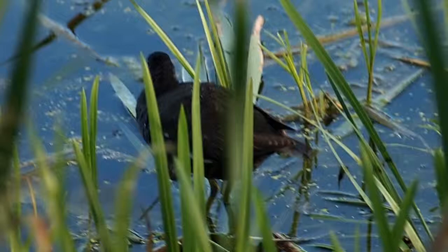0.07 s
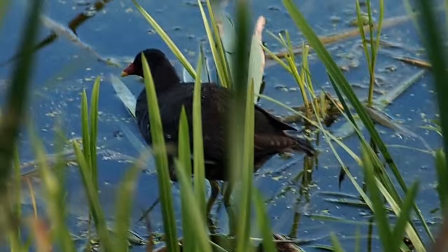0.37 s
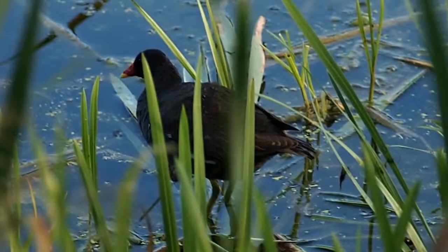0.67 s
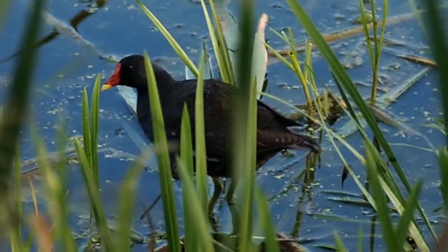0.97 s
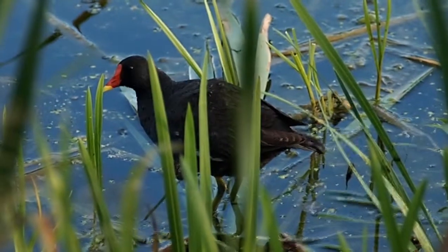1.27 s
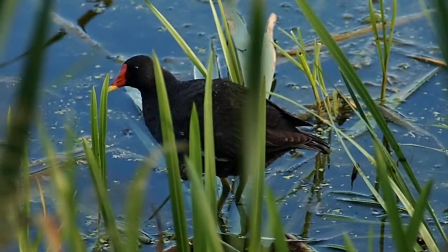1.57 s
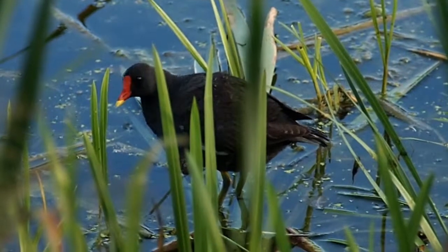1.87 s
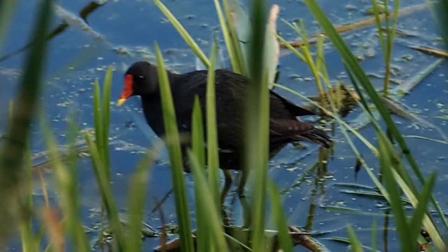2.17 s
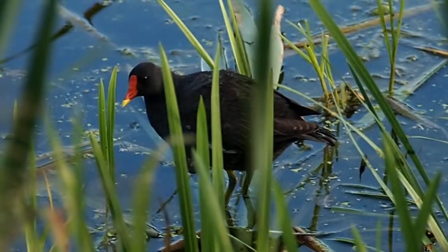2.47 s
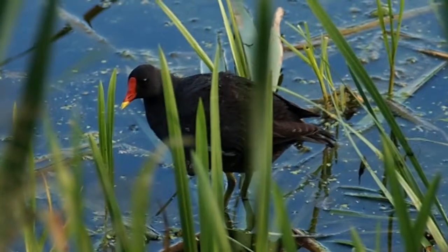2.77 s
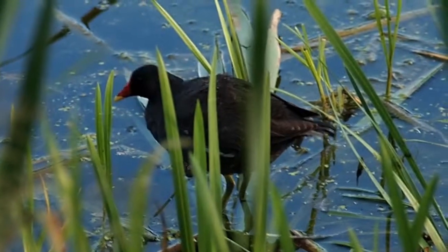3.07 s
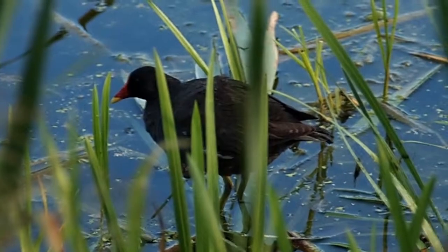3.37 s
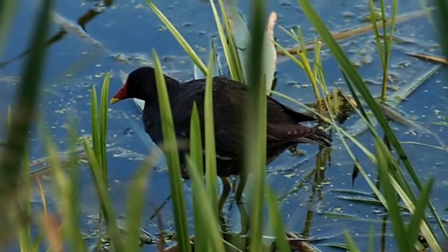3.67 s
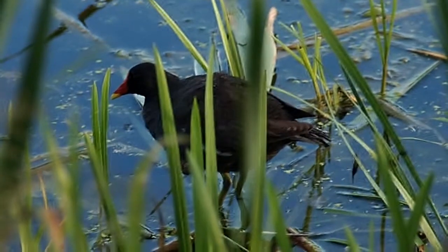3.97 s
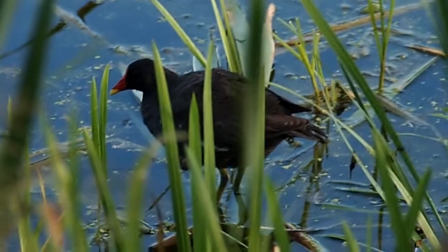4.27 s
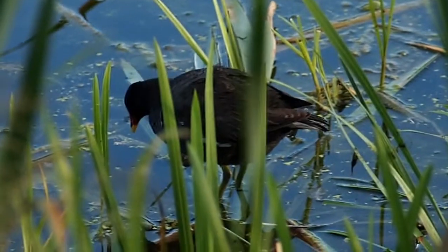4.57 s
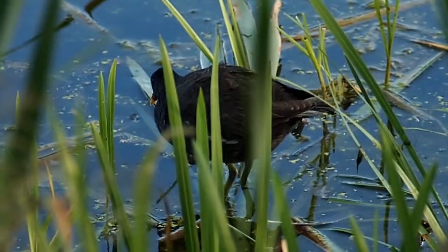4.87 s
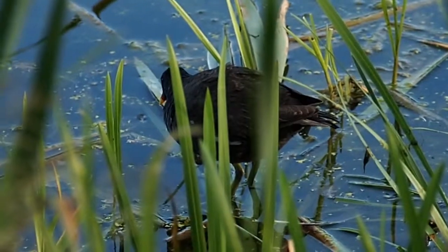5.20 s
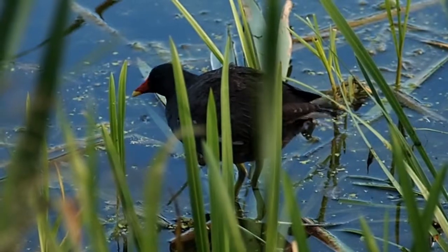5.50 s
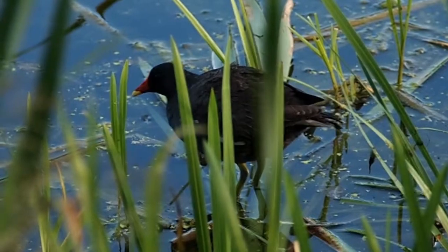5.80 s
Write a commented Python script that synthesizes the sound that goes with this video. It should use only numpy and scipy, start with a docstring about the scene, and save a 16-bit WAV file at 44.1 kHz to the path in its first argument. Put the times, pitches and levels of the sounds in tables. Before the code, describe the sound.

One brief, rasping moorhen call sounds close to the microphone early on, standing out against the continuous low rumble of a faraway road. The waterside is otherwise quiet: reeds rub softly now and then, small birds chip very faintly in the distance, and a light hiss lies over everything. Toward the end, a faint, high, fluttering whine rises and fades three times.

```python
"""Distant traffic rumbles from first to last, with a low engine drone and a thin microphone hiss.
Small birds chip far away and reeds brush softly by friction. About a second in, a moorhen gives one
short, harsh call: pulses from its syrinx ring the resonances of its throat, and the bank of the pond
reflects a faint echo. Near the end a thin, far-off whine swells three times."""
import sys
import numpy as np
from scipy import signal
from scipy.fft import rfft, irfft
from scipy.io import wavfile

SR = 44100
rng = np.random.default_rng(int(sys.argv[2]) if len(sys.argv) > 2 else 0)


def store_wav(level_fs):
    """Save 16-bit WAV to argv[1]."""
    pcm = np.round(np.clip(np.atleast_2d(level_fs), -1, 1) * 32767)
    wavfile.write(sys.argv[1], SR, pcm.T.astype(np.int16))


N = 261954
TIME = np.arange(N) / SR


def amp(db):
    """Decibels as an amplitude ratio."""
    return 10 ** (np.asarray(db) / 20)


def unit(x):
    """Normalisation to rms 1."""
    return x / np.sqrt(np.mean(x ** 2) + 1e-20)


def curve(points, t):
    """Linear interpolation of (time_s, value) points at the times t."""
    return np.interp(t, *np.transpose(points))


def spectrum(points, hz):
    """Gain interpolated from (frequency_hz, level_db) points on a log-frequency axis."""
    f, db = np.transpose(points)
    return amp(np.interp(np.log(hz + 1), np.log(f + 1), db))


def noise(shape):
    """Spectral shaping: white noise weighted by shape(hz), at rms 1."""
    return unit(irfft(rfft(rng.standard_normal(N)) * shape(np.fft.rfftfreq(N, 1 / SR)), N))


def drift(rate_hz):
    """Random modulation: low-pass noise that rolls off around rate_hz."""
    return noise(lambda hz: np.exp(-(hz / rate_hz) ** 2))


def swell(centre_s, length_s):
    """A Gaussian envelope of height 1."""
    return np.exp(-(2 * (TIME - centre_s) / length_s) ** 2)


def colour(x, points, size=2048):
    """Minimum-phase filtering: each pulse rings only after it arrives."""
    log_gain = np.log(spectrum(points, abs(np.fft.fftfreq(size, 1 / SR))))
    ring = np.fft.ifft(np.exp(np.conj(signal.hilbert(log_gain)))).real
    return signal.fftconvolve(x, ring)[:len(x)]


def resonate(x, hz, width_hz):
    """A damped resonator of gain 1 whose centre follows the curve hz."""
    phasor = np.exp(2j * np.pi * np.cumsum(hz) / SR)
    decay = np.exp(-np.pi * width_hz / SR)
    return 2 * (phasor * signal.lfilter([1 - decay], [1, -decay], x / phasor)).real


def far_tone(hz, wander, flutter_db, flutter_hz):
    """Scintillation: moving air modulates the pitch and level of a distant tone."""
    cycles = np.cumsum(hz * (1 + wander * drift(21.6))) / SR
    return unit(amp(flutter_db * drift(flutter_hz)) * np.sin(2 * np.pi * cycles))


# Spectral density of far traffic: frequency_hz, relative_db
TRAFFIC_SPECTRUM = [(12, -26), (30, -9), (56, 0), (120, -3), (165, -7), (240, -10), (390, -11),
                    (480, -17.5), (950, -16.5), (1500, -24), (2000, -31), (3000, -40), (4200, -44),
                    (6500, -62)]
# Envelope of the engine rumble: time_s, level_db
RUMBLE_ENVELOPE = [(.6, -36.5), (1.1, -37.5), (1.45, -41.5), (1.57, -34.5), (2.5, -37), (3.65, -37.5),
                   (4.02, -35.3), (4.85, -37), (5.94, -38)]

def traffic(split_hz=200, roar_db=-39.5, lumps_db=.8, waver_db=.42):
    """Amplitude-modulated noise in two bands: lumpy engine rumble under a smoother roar of tyres."""
    low_share = lambda hz: 1 / (1 + (hz / split_hz) ** 8)
    rumble = noise(lambda hz: spectrum(TRAFFIC_SPECTRUM, hz) * np.sqrt(low_share(hz)))
    roar = noise(lambda hz: spectrum(TRAFFIC_SPECTRUM, hz) * np.sqrt(1 - low_share(hz)))
    rumble *= amp(curve(RUMBLE_ENVELOPE, TIME) + lumps_db * drift(3.6))
    roar *= amp(roar_db + waver_db * drift(16))
    return rumble + roar


def engine_drone(pitch_hz=93.8, steady_db=-47.5, passing_db=-41.5):
    """Periodic vibration: one engine holds a low tone, loudest as it passes."""
    envelope = amp(steady_db) + amp(passing_db) * swell(centre_s=.96, length_s=.56)
    return far_tone(pitch_hz, wander=.031, flutter_db=-.7, flutter_hz=17) * envelope


# Spectral density of the hiss: frequency_hz, relative_db
HISS_SPECTRUM = [(2500, -24), (5200, -10.5), (6500, -7.5), (8500, -4), (10000, -1.8), (13000, -1),
                 (15500, -0.5)]

def microphone_hiss(level_db=-54.5):
    """Self-noise: a stationary hiss, strongest in the high treble."""
    return amp(level_db) * noise(lambda hz: spectrum(HISS_SPECTRUM, hz))


# Chips of far birds: centre_s, level_db, length_s, pitch_hz
BIRD_CHIPS = [(.398, -61.5, .018, 5750), (.41, -57, .02, 2300), (.419, -67, .014, 5850),
              (.853, -61, .045, 4200), (4.885, -56, .035, 2100)]

def small_birds(blur=.035, count=16, twitter_db=-73):
    """Frequency modulation blurs tiny, distant notes; fainter ones twitter at random."""
    warped_s = np.cumsum(1 + blur * drift(160)) / SR
    twitter = [(when * N / SR, twitter_db + 4 * size, .025, 4500 + 2700 * height)
               for when, size, height in rng.random((count, 3))]
    return sum(amp(db) * swell(centre, length) * np.sin(2 * np.pi * hz * warped_s)
               for centre, db, length, hz in BIRD_CHIPS + twitter)


# Strokes of leaf on leaf: centre_s, level_db, length_s
REED_STROKES = [(.41, -58, .035), (.85, -64, .07), (1.77, -63, .04), (2.54, -59, .04), (2.785, -58, .06),
                (2.815, -48, .038), (4.885, -54, .05)]
# Spectral density of the rubbing: frequency_hz, relative_db
REED_SPECTRUM = [(900, -14), (1600, -2), (2400, 1), (3300, -12), (4600, -15), (6200, -31), (10000, -42)]

def reeds(grain_db=1.2):
    """Stick-slip friction: leaves slide briefly over each other in grainy bursts of noise."""
    strokes = sum(amp(db) * swell(centre, length) for centre, db, length in REED_STROKES)
    friction = noise(lambda hz: spectrum(REED_SPECTRUM, hz))
    return friction * strokes * unit(amp(grain_db * drift(200)))


# Main resonance of the throat, bill nearly shut and open: frequency_hz, shut_db, open_db
THROAT_RESPONSE = [(400, -49, -21), (1050, -21, -27), (1310, -16, -17), (1670, -5.5, -13), (2130, -8, 0.5),
                   (2210, -4, -1), (2700, -20, -20), (3000, -32, -30.5), (3600, -42, -43), (5000, -58, -58)]
# Bright upper resonances: centre_hz, width_hz, relative_db
UPPER_FORMANTS = [(4550, 350, -5.5), (5520, 470, -9), (5940, 610, 0), (7240, 900, -10)]
# Their waver before they settle: time_s, frequency_ratio
FORMANT_WAVER = [(1.116, 1.12), (1.123, .88), (1.138, .88), (1.144, 1.16), (1.150, 1.16), (1.158, 1)]

def moorhen(start_s=1.11, push_s=.08, release_s=.016, attack_s=.008, jitter_cycles=.08, shimmer=.07):
    """Source and filter: syrinx pulses ring a throat whose resonance narrows as the bill opens."""
    t = np.arange(0, push_s + release_s, 1 / SR)
    # The bird pushes harder and harder, then lets go; the bill opens partway through.
    push = np.minimum(t / push_s, 1)
    released_s = np.maximum(t - push_s, 0)
    opening = 1 / (1 + np.exp((.03 - t) / .005))
    # The pitch climbs, levels off and flicks up on release.
    start_hz, top_hz, glide_s, flick_hz_per_s = 264, 341.5, .0265, 1400
    pitch_hz = top_hz + (start_hz - top_hz) * np.exp(-t / glide_s) + flick_hz_per_s * released_s
    # Source: roughness makes the pulses uneven and adds a puff of air to each.
    rough = np.clip(.14 * (1 - opening) + .065 * opening + 11 * released_s, 0, 1)
    cycles = np.cumsum(pitch_hz) / SR + .5 + jitter_cycles * rough * drift(290)[:len(t)]
    pulses = unit(np.cos(2 * np.pi * np.outer(cycles, np.arange(1, 28))).sum(1))
    pulses *= 1 + shimmer * drift(200)[:len(t)]
    puffs = unit(np.exp(-(cycles % 1) / .23) * rng.standard_normal(len(t)))
    drive = (1 - rough) * pulses + rough * puffs
    # Filter: the throat crossfades from its shut response to its open one.
    throat = np.array(THROAT_RESPONSE)
    shut, wide = unit(colour(drive, throat[:, :2])), unit(colour(drive, throat[:, ::2]))
    body = unit((1 - opening) * shut + opening * wide)
    # The upper resonances catch more of the rasp.
    breathy = np.clip(.33 + 2 * rough, 0, 1)
    rasp = np.sqrt(1 - breathy ** 2) * pulses + breathy * puffs
    waver = curve(FORMANT_WAVER, start_s + t)
    bright = unit(sum(amp(db) * resonate(resonate(rasp, hz * waver, width), hz * waver, width)
                      for hz, width, db in UPPER_FORMANTS))
    # Both swell with the push; the bright part dies more slowly.
    body_db = -34 + 9 * push - 1700 * released_s
    bright_db = -55 + 12 * push ** 2 - 800 * released_s
    voice = (1 - np.exp(-t / attack_s)) * amp(body_db) * body + amp(bright_db) * bright
    voice *= signal.windows.tukey(len(t), .03)
    return np.interp(TIME, start_s + t, voice, left=0, right=0)


# Reflections from the bank: delay_s, level_db
BANK_REFLECTIONS = [(.045, -30), (.115, -36), (.16, -29)]

def bank_echo(call, scatter_db=-26, t60_s=.7, smear_s=.012):
    """Reflection and scattering: stems smear a few weak echoes, and reeds add a thin decaying tail."""
    t = TIME[:SR]
    echoes = sum(amp(db) * np.exp(-((t - delay) / smear_s) ** 2) for delay, db in BANK_REFLECTIONS)
    tail = amp(-60 * t / t60_s)
    envelope = echoes / np.sqrt(smear_s * SR) + amp(scatter_db) * tail / np.linalg.norm(tail)
    return signal.fftconvolve(call, envelope * rng.standard_normal(SR))[:N]


# Swells of the far whine: centre_s, level_db, length_s
WHINE_SWELLS = [(5.26, -51.8, .27), (5.55, -52, .18), (5.79, -49, .26)]

def far_whine(pitch_hz=1567):
    """Amplitude modulation: one thin, fluttering tone swells and fades."""
    envelope = sum(amp(db) * swell(centre, length) for centre, db, length in WHINE_SWELLS)
    return far_tone(pitch_hz, wander=.006, flutter_db=2.2, flutter_hz=55) * envelope


def scene():
    """Superposition: the bird close by, the pond around it and the road far behind."""
    call, drone, whine = moorhen(), engine_drone(), far_whine()
    return (call + bank_echo(call) + traffic() + drone + whine + reeds() + small_birds())[None]


def record(dry, start_s=.259, settle_db=-3.5, settle_s=.09, notch_hz=7890, cutoff_hz=15750):
    """Gain and filtering: after a brief silence the level settles; hiss, a notch and a low-pass follow."""
    running_s = np.maximum(TIME - start_s, 0)
    sound = dry * amp(settle_db * np.exp(-running_s / settle_s)) + microphone_hiss()
    hz = np.fft.rfftfreq(N, 1 / SR)
    notch = 1 - np.exp(-((hz - notch_hz) / 125) ** 2)
    fade_in = np.minimum(running_s / .001, 1)
    sound = irfft(rfft(sound) * notch, N) * fade_in
    low_pass = signal.firwin(1023, cutoff_hz, window=("kaiser", 9), fs=SR)
    return signal.oaconvolve(sound, low_pass[None], "same")


dry = scene()
out = record(dry)
store_wav(out)
```